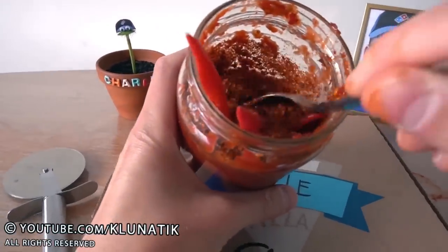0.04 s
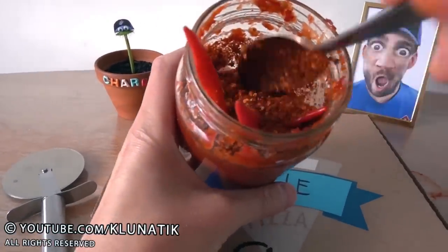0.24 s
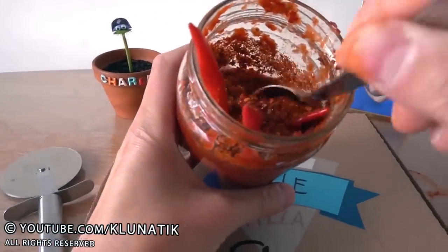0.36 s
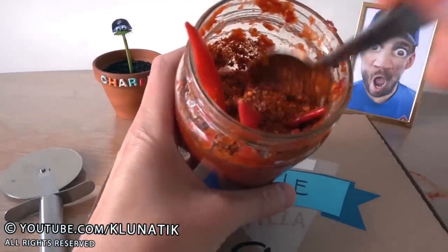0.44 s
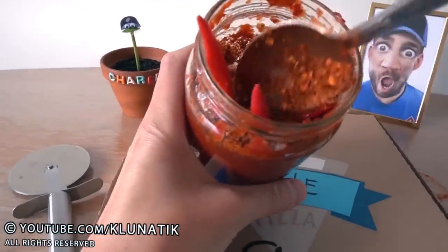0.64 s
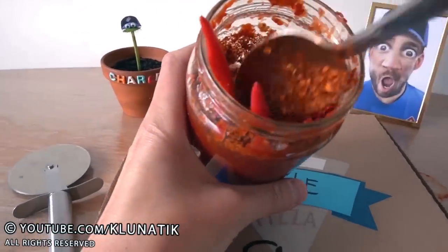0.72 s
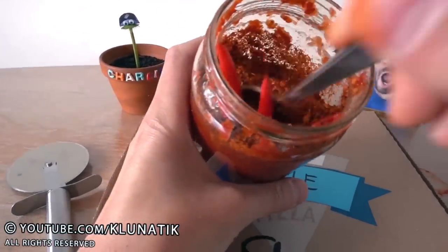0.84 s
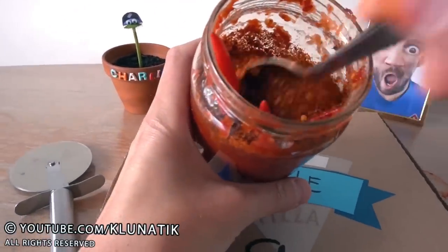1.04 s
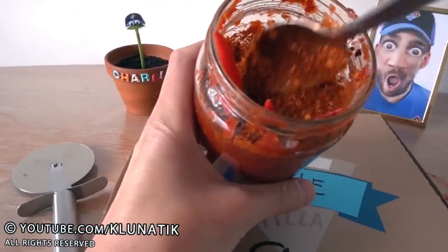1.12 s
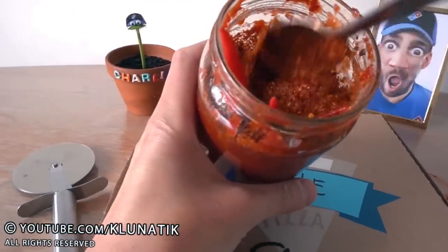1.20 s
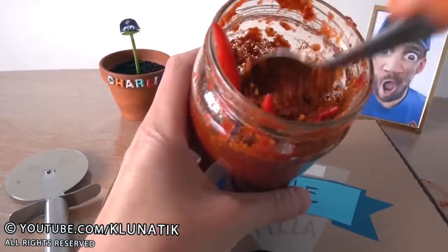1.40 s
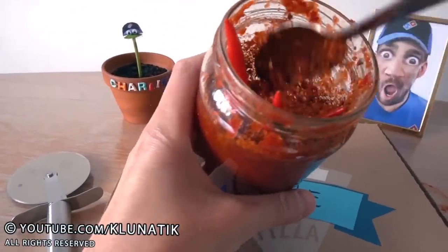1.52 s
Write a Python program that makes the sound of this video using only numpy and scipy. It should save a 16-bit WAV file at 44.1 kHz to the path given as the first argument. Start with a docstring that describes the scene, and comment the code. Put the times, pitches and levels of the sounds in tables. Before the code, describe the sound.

A metal spoon works in a hand-held glass jar of thick sauce, heard close. It starts quietly with low hum and faint hiss; short damped clinks come at about 0.25, 0.36 and 0.5 seconds, the last strongest, with a brief scrape and squeak around 0.3. Softer scraping and wet sliding follow from 0.5 to 0.9, then squelches, plops and a sharp sticky tick near 1.3, with more wet stirring until 1.55. The room is lightly reverberant.

```python
"""Spoon against a glass jar of sauce

A metal spoon knocks three times on a hand-held jar (noise cracks and decaying modes), scrapes its wall
(dense slips ringing the same modes, brief squeaks) and slides through thick sauce (fine shaped grains).
Wet ticks and plops are short sine pulses; the squelch is clicks through a resonator. A hard-walled room
(decaying noise taps) answers the contacts over an appliance hum of drifting sines and faint hiss.
"""
import sys
import numpy as np
from scipy import signal
from scipy.fft import rfft, irfft
from scipy.io import wavfile
from scipy.ndimage import uniform_filter1d

SR = 44100
rng = np.random.default_rng(int(sys.argv[2]) if len(sys.argv) > 2 else 0)


def voltage_ratio(decibels):
    """Convert decibels (scalar or array-like) to amplitude ratios, 20 dB per decade."""
    exponent = np.asarray(decibels, float) / 20
    return 10 ** exponent


def log_audio(samples):
    """Write samples as a 16-bit WAV file to the path given in sys.argv[1]."""
    # one column per channel
    frames = np.atleast_2d(samples).T
    # limit to full scale, then quantise
    limited = np.clip(frames, -1, 1)
    pcm = np.round(limited * 32767).astype(np.int16)
    wavfile.write(sys.argv[1], SR, pcm)


N = 68355

# Room air and microphone hiss. Each row: frequency in Hz, density in dB per Hz.
AIR_SPECTRUM = [(20, -92), (60, -89.5), (120, -77.5), (170, -79.5), (250, -83.5), (400, -84), (700, -89.5),
                (1100, -93), (2000, -94), (3200, -101), (5000, -102), (8000, -104), (13500, -105),
                (13900, -130), (16000, -150)]
# Likeness of the hiss left and right. Each row: frequency in Hz, correlation from 0 to 1.
AIR_LIKENESS = [(30, .99), (200, 0.96), (1000, 0.3), (4000, 0.18), (12000, 0.13)]
# Appliance hum, two motors with overtones. Each row: frequency in Hz, level in dB rms,
# size of each drift sine in Hz.
HUM_TONES = [(85.3, -47.5, 0.074), (168.8, -61.5, 0.36), (257.5, -69.5, 1.78), (350.6, -67, 0.43),
             (145.7, -50, 0.62), (284, -67, 1.26), (447.7, -66.5, 3.7)]
# Room decay. Each row: frequency in Hz, T60 in seconds.
ROOM_T60 = [(300, 0.33), (1000, 0.72), (2000, 0.68), (4000, 0.73), (8000, 0.24), (13000, 0.098)]
# Room spectrum before normalising. Each row: frequency in Hz, relative level in dB.
ROOM_SPECTRUM = [(300, 9.5), (1000, 2.7), (2000, 3.1), (4000, -2), (8000, 5), (13400, -1), (13900, -35)]
ROOM_DB, ROOM_BUILD_S, ROOM_LIKENESS = -13, 0.019, 0.56
# Dull squelch of the sauce. Each row: time in seconds, level in dB.
SQUELCH_LEVEL = [(0, -60.5), (.35, -63), (.38, -50), (.45, -55.5), (.55, -49), (.68, -65), (.74, -59),
                 (.8, -60), (.85, -74), (.93, -77), (.95, -53), (.99, -64), (1.04, -58), (1.1, -75),
                 (1.385, -65), (1.41, -56), (1.48, -53.5), (1.55, -68)]
SQUELCH_HZ, SQUELCH_PASS_WIDTH_HZ = 600, 710  # width of each of two passes
# Spoon sliding through sauce. Each row: time in seconds, gain in dB, tilt in dB per octave.
SLIDE_STROKE = [(0, -49, 0), (.06, -61, -2.5), (.2, -61, -2), (.24, -50, -1), (.27, -69, 0.1),
                (0.346, -44, 6), (.4, -53.5, -6), (.49, -56.5, -0.5), (.52, -49.5, 0.5), (.6, -53.5, -8),
                (.69, -64, -10), (.706, -52, -2), (.73, -65, 1), (0.75, -46, -3), (.78, -49, -1.5),
                (0.822, -46.5, -3.5), (.9, -52, 2), (0.958, -61.5, -3.5), (1.08, -64, 3),
                (1.12, -55.5, 6.5), (1.18, -56, 6), (1.22, -67, 9), (1.277, -46, 0.7), (1.34, -54.5, -1),
                (1.382, -66.5, -3), (1.491, -53, 1), (1.55, -75, 7)]
# Slide spectrum before tilting. Each row: frequency in Hz, relative level in dB.
SLIDE_SPECTRUM = [(1000, -36), (2500, -0.5), (4000, -2), (6200, 1), (7000, -1.5), (8000, 0), (9500, -3.5),
                  (11000, 1), (12500, -3), (13500, -1.5), (13900, -39), (16000, -47)]
SLIDE_PAN_DB, SLIDE_GRAINS_PER_S, SLIDE_GRAIN_SPREAD_DB = -2, 5800, 2
SLIDE_PATCHY_DB_RMS, SLIDE_PULSING_DB_RMS = 1.5, 1.5
# Wet ticks of the sauce. Each row: start in seconds, envelope peak in dB, frequency in Hz,
# left-right difference in dB.
WET_TICKS = [(.174, -44, 5580, -1), (.2263, -40, 9100, -3.5), (.343, -27, 8600, -1),
             (.5178, -27.5, 9200, -3), (.7045, -40.5, 5570, 1), (.748, -33.5, 6300, -7),
             (1.2735, -44, 8200, -0.5), (1.2953, -23, 7000, -6.5), (1.3385, -59, 7100, -1.5),
             (1.478, -42, 10000, 3), (1.4955, -29.5, 5700, -4), (1.527, -40, 10400, -7)]
# Soft plops as lumps of sauce let go. Each row: start in seconds, envelope peak in dB, frequency in Hz,
# left-right difference in dB.
SOFT_PLOPS = [(.755, -34, 1870, -3), (.821, -37.5, 1670, -6), (.838, -40.5, 800, 0), (.9395, -41, 548, 2),
              (1.035, -47, 640, 2), (1.399, -44, 600, -1.5), (1.426, -43.5, 620, -.4), (1.474, -48, 680, 7)]
TICK_CYCLES_TO_PEAK = 0.99
# Dragging edge locked onto one mode. Each row: start in seconds, length in seconds,
# level in dB before doubling, frequency in Hz.
SQUEAK_TONES = [(0.298, 0.041, -46.5, 831), (.3, 0.034, -47.5, 2010), (0.327, .026, -41, 1606),
                (.328, 0.036, -49, 2380)]
SQUEAK_WOBBLE_RMS, SQUEAK_FLUTTER_DB_RMS = 0.035, 4.8  # wobble as a share of the pitch
# Spoon edge dragging on glass. Each row: time in seconds, drive level in dB.
SCRAPE_LEVEL = [(.23, -98), (.24, -47.5), (.25, -52.5), (.295, -52.5), (.312, -54), (.325, -50),
                (.336, -46), (.352, -39.5), (.362, -80), (.5, -82), (.525, -44.5), (.6, -48.5), (.735, -75),
                (.755, -50.5), (.78, -64), (.822, -54.5), (.85, -60), (.88, -57.5), (.9, -57), (.93, -70)]
SCRAPE_SLIPS_PER_S, SCRAPE_SLIP_SPREAD_DB, SCRAPE_CUTOFF_HZ = 1600, 4.45, 5200
# Modes of the sauce-damped jar and spoon. Each row: frequency in Hz, T60 in seconds before damping,
# level in dB from spot 0, from spot 1, from spot 2, from the dragged edge.
JAR_MODES = [(269, 0.027, -22, -12, -61, -42), (549.4, .08, -29, -14, -11, -11.5),
             (680, 0.04, -11, -8.5, -8.5, -38), (800, 0.054, -30, -3, -11.5, 0),
             (988, 0.035, -11, -16, -12.5, -18), (1141, .05, -10.5, -2.5, -21, -4),
             (1382, 0.089, -43, -38, -14.5, -10.5), (1633, 0.032, -6, -8, -13, 6),
             (1720, 0.017, 3, -16, 3.5, 6.5), (1884, 0.028, -6, -2, -10, 4.5),
             (2016, 0.043, -2, -15, -6, 2), (2302, 0.047, -4.5, -9, -5.5, -2.5),
             (2593, .025, 0.5, -3, -11, -2), (3050, 0.0083, 2.5, -2, -14, 3), (3773, 0.018, -26, -11, 1, 0),
             (4272, 0.031, -11, -6, -12, -4.5), (5685, 0.032, -15, -9.5, -12.5, -3.5),
             (6300, 0.0083, 4.5, -23, -37, -28), (9400, 0.0073, -4.5, 2.5, -24, -14),
             (10700, 0.016, -3, -19, -28, -9), (11300, 0.014, -9, 3.5, -11.5, 5)]
CONTACT_MS = 0.25  # rise of the ring
PARTNER_DB = -13  # against its mode
STRUCK_DAMPING, DRAG_DAMPING = 0.97, 0.43  # factors on T60; the pressing edge shortens the ring
# Broadband crack as metal meets glass, one list per spot. Each row: frequency in Hz, relative level in dB.
CRACK_SPECTRA = [
    [(600, -60), (1200, -30), (2600, 10.5), (4500, -1), (6200, 1), (8000, 1), (10800, 2), (13500, -19),
     (16000, -20)],
    [(600, -60), (1200, -25), (2600, 6.5), (4500, -9.5), (6500, 8), (8000, -8), (11200, 5.5), (13500, 3.5),
     (16000, -1.5)],
    [(600, -57), (1200, -7.5), (2400, -3), (3800, -11.5), (4700, -14.5), (8000, -14.5), (11300, -19.5),
     (13500, -25), (16000, -36)],
]
# Crack decay below the split. Each entry: T60 in seconds of one spot.
CRACK_LOW_T60 = [0.03, 0.054, 0.022]
# Crack decay above the split. Each entry: T60 in seconds of one spot.
CRACK_HIGH_T60 = [0.019, 0.012, 0.013]
# Crack gain against the ring. Each entry: gain in dB of one spot.
CRACK_GAIN = [-2.5, -2, -2]
CRACK_SPLIT_HZ, CRACK_APART, CRACK_UNEVEN_DB_RMS = 5600, 0.5, 4.5  # apart: noise opposed left and right
# Spoon knocks. Each row: start in seconds, gain in dB, chatter length in ms, left-right difference in dB,
# room send in dB against the knock, index of the spot struck.
SPOON_KNOCKS = [(0.2454, -24, .6, -4.5, -2, 0), (0.3555, -21, 5, -2.5, -1.5, 1),
                (0.4937, -14.5, 0.21, -1, 1.5, 2)]
BODY_LAG = 0.2975  # share of the chatter that passes before the ring starts
# Top-end roll-off of the finished mix. Each row: frequency in Hz, gain in dB.
TOP_ROLL_OFF = [(13400, -1), (14000, -14), (16000, -31), (16600, -60)]


def read(points, hz):
    """Interpolates a table over log frequency."""
    f, value = np.transpose(points)
    return np.interp(np.log(hz + 1), np.log(f + 1), value)


def level(curve):
    """Gain over time from a dB curve."""
    s, db = np.transpose(curve)
    return voltage_ratio(np.interp(np.arange(N) / SR, s, db))


def evened(x):
    """Scales to rms 1."""
    return x / np.sqrt(np.mean(x ** 2) + 1e-20)


def smoothed_noise(shape, size):
    """Moving average of noise along the last axis, at rms 1."""
    return evened(uniform_filter1d(rng.standard_normal(shape), size=size))


def coloured(x, points):
    """Filters by a dB spectrum."""
    gain = voltage_ratio(read(points, np.fft.rfftfreq(x.shape[-1], 1 / SR)))
    return irfft(rfft(x) * gain, x.shape[-1])


def panned(x, pan_db):
    """Sets the left-right level difference."""
    return x * voltage_ratio(np.array([[pan_db / 2], [-pan_db / 2]]))


def grit(per_s, spread_db):
    """Random clicks of either sign, a few large."""
    size_db = spread_db * np.minimum(rng.exponential(1, N), 5)
    size = voltage_ratio(size_db) * rng.choice([-1., 1.], N)
    return size * (rng.random(N) < per_s / SR)


def air():
    """Room air and microphone hiss: shaped noise, alike in the bass and apart in the treble."""
    a, b = rfft(rng.standard_normal((2, N)))
    hz = np.fft.rfftfreq(N, 1 / SR)
    same = np.clip(read(AIR_LIKENESS, hz), 0, 1)
    mid, side = a * np.sqrt((1 + same) / 2), b * np.sqrt((1 - same) / 2)
    gain = voltage_ratio(read(AIR_SPECTRUM, hz)) * np.sqrt(SR / 2)
    return irfft(np.array([mid + side, mid - side]) * gain, N)


def hum():
    """Motor hum: steady sines, each pitch drifting by three slow sines."""
    t, out = np.arange(N) / SR, 0
    for hz, db, wobble_hz in HUM_TONES:
        p = rng.random(4)
        drift = sum(np.sin(2 * np.pi * (f * t + q)) for f, q in zip((1.3, 3.1, 6.7), p))
        cycles = np.cumsum(hz + wobble_hz * drift) / SR + p[3]
        out = out + np.sqrt(2) * voltage_ratio(db) * np.sin(2 * np.pi * cycles)
    return out


def room(x):
    """Reflections from the walls: noise taps that build up, then decay at a rate set by frequency."""
    a, b = rng.standard_normal((2, SR))
    mid, side = a * np.sqrt(1 + ROOM_LIKENESS), b * np.sqrt(1 - ROOM_LIKENESS)
    hz, t, z = signal.stft(np.array([mid + side, mid - side]), SR, nperseg=256)
    z = z * voltage_ratio(read(ROOM_SPECTRUM, hz)[:, None] - 60 * t / read(ROOM_T60, hz)[:, None])
    build = np.minimum(np.arange(SR) / SR / ROOM_BUILD_S, 1) ** 2
    tail = signal.istft(z, SR, nperseg=256)[1][:, :SR] * build
    tail = tail / np.linalg.norm(tail[0])
    return voltage_ratio(ROOM_DB) * signal.fftconvolve(x[None], tail, axes=1)[:, :N]


def squelch():
    """Low lumps ringing the air in the jar: clicks through a resonator twice."""
    b, a = signal.iirpeak(SQUELCH_HZ, SQUELCH_HZ / SQUELCH_PASS_WIDTH_HZ, fs=SR)
    once = signal.lfilter(b, a, grit(900, 3.2))
    return evened(signal.lfilter(b, a, once)) * level(SQUELCH_LEVEL)


def slide():
    """Rubbing in sauce: dense grains and noise whose level and tilt follow the stroke, uneven in patches."""
    grains = grit(SLIDE_GRAINS_PER_S, SLIDE_GRAIN_SPREAD_DB)
    both = grains + 0.84 * grains.std() * rng.standard_normal((2, N))
    hz, t, z = signal.stft(evened(coloured(both, SLIDE_SPECTRUM)), SR, nperseg=256)
    s, db, tilt = np.transpose(SLIDE_STROKE)
    octaves = np.log2((hz[:, None] + 100) / 7000)
    patches = uniform_filter1d(rng.standard_normal(z.shape[1:]), size=4, axis=0)
    patches = evened(uniform_filter1d(patches, size=8, axis=1))
    pulsing = smoothed_noise(len(t), 3)
    uneven_db = SLIDE_PATCHY_DB_RMS * patches + SLIDE_PULSING_DB_RMS * pulsing
    z = z * voltage_ratio(octaves * np.interp(t, s, tilt) + uneven_db)
    rubbing = signal.istft(z, SR, nperseg=256)[1][:, :N]
    return panned(rubbing * level(np.transpose([s, db])), SLIDE_PAN_DB)


def ticks():
    """Wet ticks and plops: sine pulses with a soft start and a fast decay."""
    out, n = np.zeros((2, N + 1500)), np.arange(1500)
    for s, db, hz, pan_db in WET_TICKS + SOFT_PLOPS:
        at = round(s * SR)
        u = n / SR * hz / TICK_CYCLES_TO_PEAK
        pulse = u * np.exp(1 - u) * np.sin(2 * np.pi * hz * n / SR)
        out[:, at:at + 1500] += panned(voltage_ratio(db) * pulse, pan_db)
    return out[:, :N]


def squeaks():
    """The edge locks onto a mode: brief wavering sines that swell and fade."""
    out = np.zeros(N)
    t = np.arange(3000) / SR
    for s, length_s, db, hz in SQUEAK_TONES:
        at = round(s * SR)
        wobble, flutter = smoothed_noise((2, 3000), 150)
        swell = np.sin(np.pi * np.clip(t / length_s, 0, 1)) * voltage_ratio(db + SQUEAK_FLUTTER_DB_RMS * flutter)
        cycles = np.cumsum(hz * (1 + SQUEAK_WOBBLE_RMS * wobble)) / SR
        out[at:at + 3000] += 2 * swell * np.sin(2 * np.pi * cycles)
    return panned(out, -3.5)


def scrape():
    """Stick-slip on glass: dense dulled slips ring the jar modes."""
    slips = grit(SCRAPE_SLIPS_PER_S, SCRAPE_SLIP_SPREAD_DB)
    slips = signal.lfilter(*signal.butter(2, SCRAPE_CUTOFF_HZ, fs=SR), slips)
    jar = ring(spot=len(SPOON_KNOCKS), damping=DRAG_DAMPING)  # last level column
    drive = evened(slips) * level(SCRAPE_LEVEL)
    return panned(signal.oaconvolve(drive, jar / np.linalg.norm(jar))[:N], -1.5)


def ring(spot, damping=STRUCK_DAMPING):
    """Jar impulse response: decaying modes, each thickened by a weaker partner at a random nearby pitch."""
    t, out = np.arange(5000) / SR, 0
    for k, row in enumerate(JAR_MODES):
        hz, t60_s, db = row[0], row[1] * damping, row[2 + int(spot)]
        partner_hz = hz * (1 + rng.uniform(-0.07946, 0.058))
        pair = np.sin(2 * np.pi * hz * t) + voltage_ratio(PARTNER_DB) * np.sin(2 * np.pi * partner_hz * t)
        out = out + (-1) ** k * voltage_ratio(db - 60 * t / t60_s) * pair
    return np.minimum(t * 1000 / CONTACT_MS, 1) * out


def crack(spot, chatter_ms):
    """Metal meets glass: uneven noise held for the chatter, then decaying, the treble faster."""
    spot = int(spot)
    a, b, c = rng.standard_normal((3, 2048))
    noise = np.array([a + CRACK_APART * b, a - CRACK_APART * b])
    burst = evened(coloured(noise, CRACK_SPECTRA[spot]))
    low = signal.filtfilt(*signal.butter(2, CRACK_SPLIT_HZ, fs=SR), burst)
    after_s = np.maximum(np.arange(2048) / SR - chatter_ms / 1000, 0)
    dying = low * voltage_ratio(-60 * after_s / CRACK_LOW_T60[spot])
    dying = dying + (burst - low) * voltage_ratio(-60 * after_s / CRACK_HIGH_T60[spot])
    uneven_db = CRACK_UNEVEN_DB_RMS * evened(uniform_filter1d(c, size=30))
    return signal.lfilter(*signal.butter(2, 900, "high", fs=SR), voltage_ratio(CRACK_GAIN[spot] + uneven_db) * dying)


def knocks():
    """Each knock is a crack at first touch, then the jar ring; returns the near sound and the room send."""
    out = np.zeros((3, N))
    for s, db, chatter_ms, pan_db, room_db, spot in SPOON_KNOCKS:
        at, lag = round(s * SR), round(BODY_LAG * chatter_ms / 1000 * SR)
        sound = np.zeros((2, 6000))
        sound[:, :2048] += crack(spot, chatter_ms)
        sound[:, lag:lag + 5000] += ring(spot)
        out[:2, at:at + 6000] += panned(voltage_ratio(db) * sound, pan_db)
        out[2, at:at + 6000] += voltage_ratio(db + room_db) * sound.mean(0)
    out = signal.lfilter(*signal.butter(2, 200, "high", fs=SR), out)
    return out[:2], out[2]


def scene():
    """Sums the contacts, their room answer, the sauce and the background."""
    hits, send = knocks()
    small = scrape() + squeaks() + ticks()
    return hits + small + room(send + small.mean(0)) + slide() + squelch() + hum() + air()


def band_limit(x):
    """A steep low-pass at the top of the band."""
    return signal.sosfilt(signal.butter(12, 15590, fs=SR, output="sos"), x)


def record(dry):
    """Rolls off the top end steeply and finishes the mix."""
    mix = coloured(dry, TOP_ROLL_OFF)
    return band_limit(mix)


dry = scene()
out = record(dry)
log_audio(out)
```